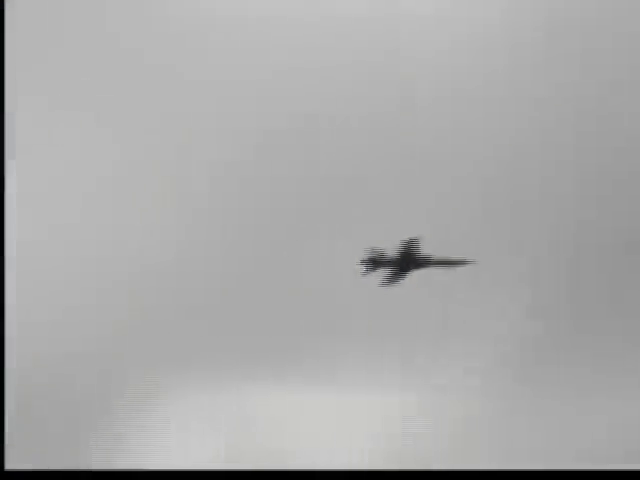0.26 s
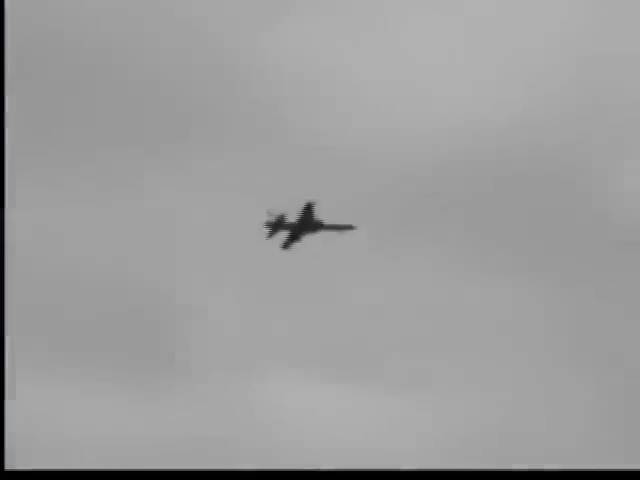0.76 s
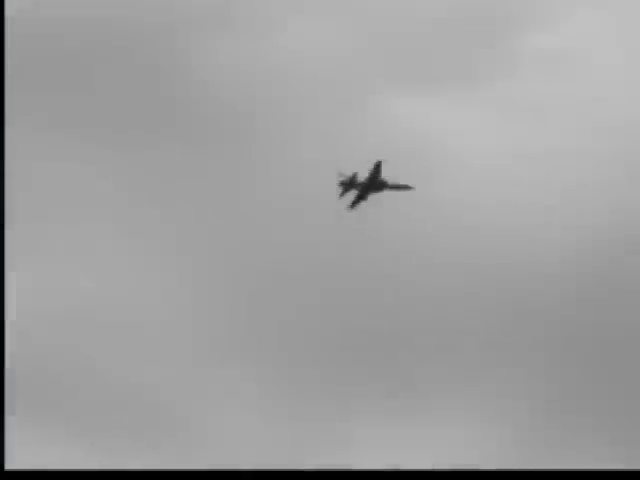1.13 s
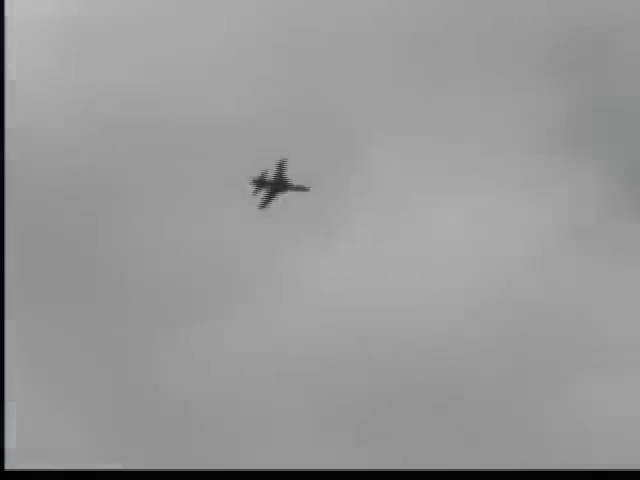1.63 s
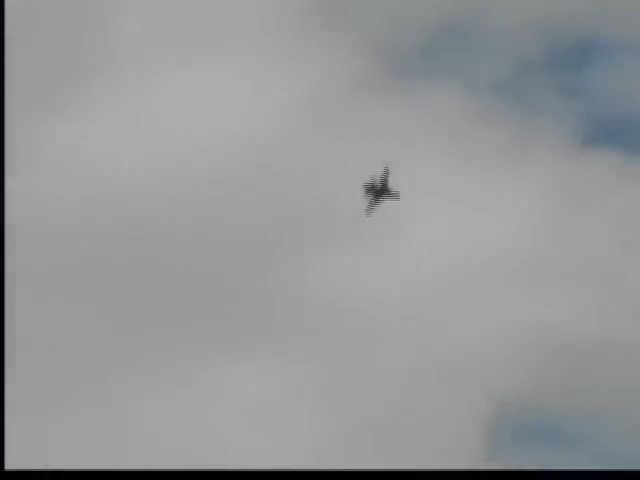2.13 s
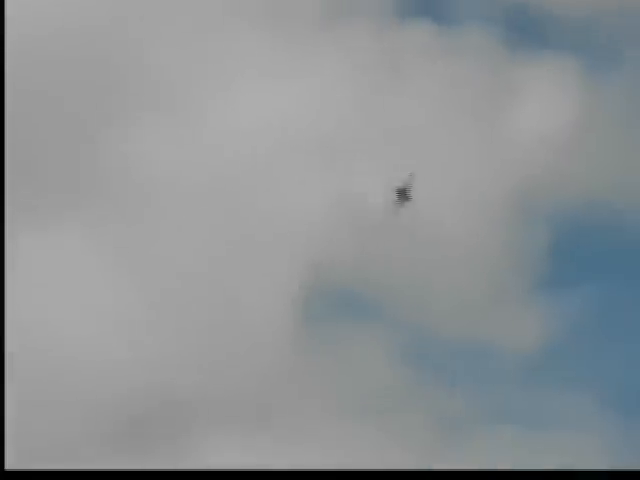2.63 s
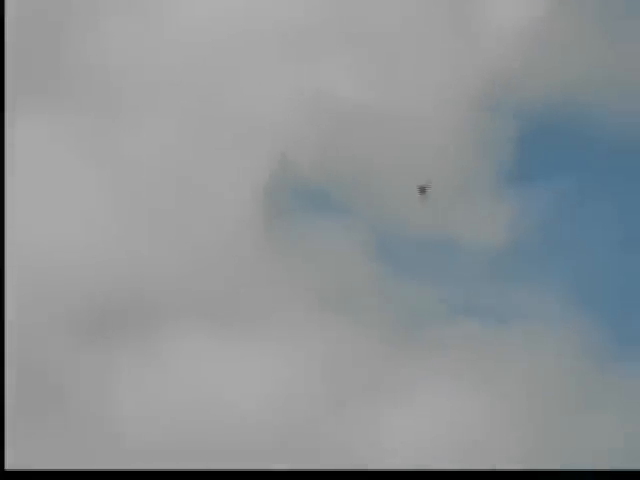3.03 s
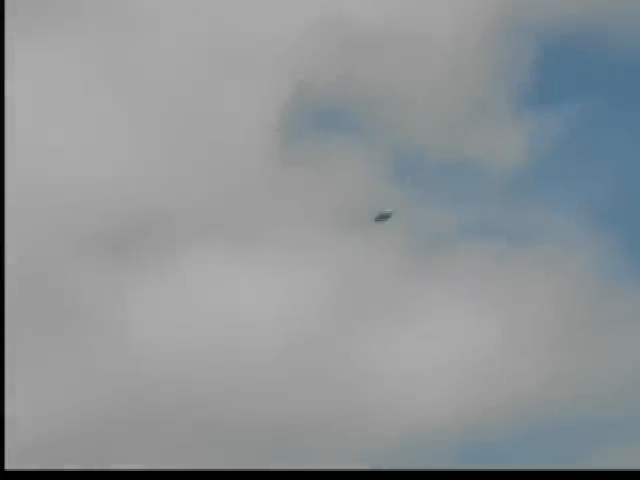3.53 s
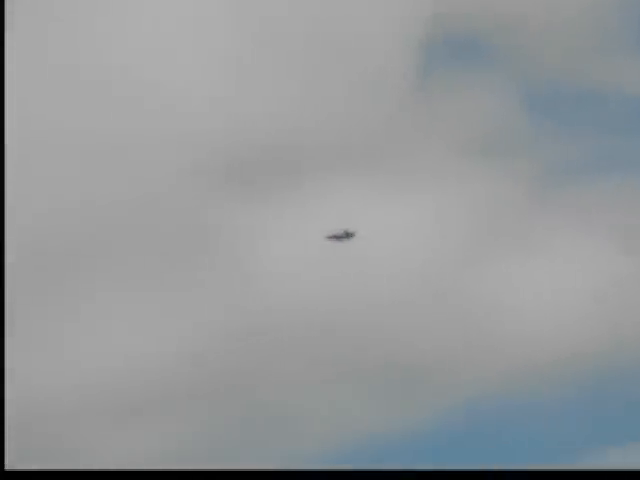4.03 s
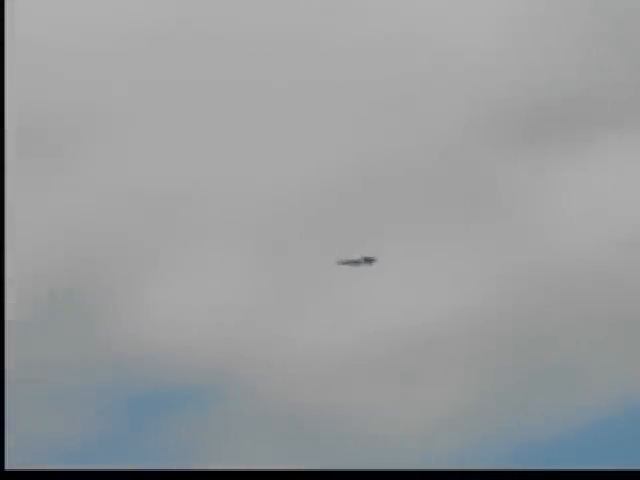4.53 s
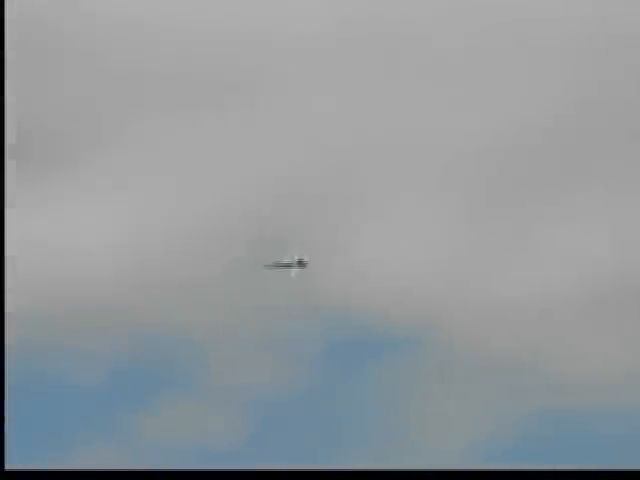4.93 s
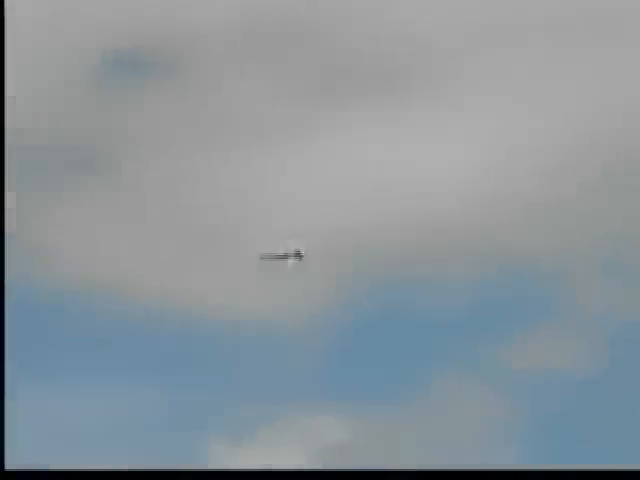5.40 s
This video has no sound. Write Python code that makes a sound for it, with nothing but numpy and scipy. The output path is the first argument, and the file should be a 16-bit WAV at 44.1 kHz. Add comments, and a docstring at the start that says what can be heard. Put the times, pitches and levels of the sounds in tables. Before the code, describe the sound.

A model jet passes over an open field with a low roar and a bright, hollow rush. A faint high turbine whine sinks and fades early. The exhaust flutters and hisses in uneven swells, growing quieter and duller as the jet banks away, then builds again as it turns back. A light breeze rumbles on the microphone over a faint low drone.

```python
"""A model jet with a small gas turbine passes overhead, banks away and turns back over an open field.
Its exhaust is a low roar, a bright rush and a hiss, fluttering in turbulent air; a thin blade tone
sinks and fades early. The ground echo lags a few ms, less as the jet nears the horizon, so a hollow
comb sweeps. Behind it: breeze on the microphone, a low field drone and three faint falling hoots."""
import sys
import numpy as np
from scipy import signal
from scipy.fft import rfft, irfft, next_fast_len
from scipy.io import wavfile
from scipy.ndimage import uniform_filter1d, map_coordinates

SR = 44100
rng = np.random.default_rng(int(sys.argv[2]) if len(sys.argv) > 2 else 0)


def waveform_to_disk(signal):
    """Save audio, clipped to [-1, 1], as 16-bit WAV at the path in sys.argv[1]."""
    frames = np.transpose(np.atleast_2d(signal))
    scaled = np.clip(frames, -1, 1) * 32767
    samples = np.round(scaled).astype(np.int16)
    wavfile.write(sys.argv[1], SR, samples)


N = 249606
FRAME, HOP = 1024, 256
TIME_S = np.arange(N) / SR
FRAME_TIME_S = np.arange(N // HOP + 6) * HOP / SR
BIN_HZ = np.fft.rfftfreq(FRAME, 1 / SR)

# wind rumble (frequency [Hz], relative density [dB])
BREEZE_SPECTRUM = [(20, -44), (45, -26), (68, -26), (85, -5), (105, 0), (125, 2), (160, -3), (220, -8.5),
                   (400, -18.5), (1500, -50.5)]
# field drone (frequency [Hz], relative density [dB])
DRONE_SPECTRUM = [(180, -28), (270, -0.5), (312, 6), (350, 1), (430, -8), (1500, -18.5), (9000, -50)]
# field drone (time [s], level [dB])
DRONE_ENVELOPE = [(0, -61), (1.3, -52), (1.8, -47), (2.8, -45.5), (4, -43), (5, -41.5), (5.66, -52)]
# distant hoots (onset [s], length [s], start pitch [Hz], end pitch [Hz], level [dB])
HOOT_EVENTS = [(1.66, .1, 495, 445, -42), (3.16, .11, 545, 410, -39), (4.0, .1, 520, 425, -41)]

# hollow resonances near the microphone (frequency [Hz], bandwidth [Hz], relative gain [dB])
RING_MODES = [(1015, 40, 8), (1500, 55, 4.5), (1985, 60, 2), (2500, 50, -2.5), (2970, 55, -.5)]
# resonance strength, greatest with the jet high (time [s], gain [dB])
RING_ENVELOPE = [(0, -0.5), (.9, 0.5), (1.35, -4.5), (1.8, -12), (3, -38), (5.66, -28)]
# reflection off grass (frequency [Hz], gain [dB])
GROUND_RESPONSE = [(100, -13), (400, -8), (900, -5.5), (1600, -10), (3000, -7.5), (4500, -9), (11000, -20)]
# ground echo; soft turf turns the phase more on a flat path (time [s], lag [ms], phase lag [rad])
ECHO_PATH = [(.6, 4.06, -.2), (1, 3.99, 0), (1.3, 3.85, .1), (1.6, 3.62, .5), (2.8, 3.2, .3),
             (3.6, 2.96, .7), (4, 2.76, 1.4), (4.8, 2.64, 1.3), (5.66, 2.5, 1)]
# ground echo strength (time [s], gain [dB])
ECHO_ENVELOPE = [(0, 2), (1.3, 6.5), (2, 2.5), (3.3, 1), (4.8, 0.5), (5.66, 2)]

# narrow treble notch near 7.8 kHz (frequency [Hz], gain [dB])
TREBLE_NOTCH = [(7000, 0), (7500, -5), (7750, -43), (7950, -30), (8250, -9.5), (8700, -5.5)]
# diffuse stereo width (frequency [Hz], gain [dB])
WIDTH_RESPONSE = [(200, -28), (800, -35), (1300, -23), (2200, -32), (2600, -22.5), (3800, -10), (4200, -55),
                  (6000, -64), (7000, -38), (9000, -32), (10500, -15)]
# weight of the timing difference between the two microphone ports (frequency [Hz], gain [dB])
PORT_SPREAD_RESPONSE = [(300, -20), (700, -15), (1500, -49), (2200, -34), (2600, -10.5), (3700, -29),
                        (4300, -69), (9000, -54)]
# lean toward the right port (frequency [Hz], gain [dB])
PORT_LEAN_RESPONSE = [(250, -23), (700, -33), (1500, -49), (2600, -37), (5000, -62)]

# Doppler-shifted blade tone (time [s], pitch [Hz])
WHISTLE_PITCH = [(0, 8370), (.4, 8230), (.65, 8090), (1.1, 8030), (1.5, 7900)]
# exhaust roar (frequency [Hz], relative density [dB])
ROAR_SPECTRUM = [(40, -68), (100, -2), (190, -2), (250, -1.5), (320, -1), (440, -0.5), (540, 0.5), (700, 3),
                 (880, -4), (1300, -6.5), (3000, -43.5)]
# exhaust roar, strongest behind the nozzle (time [s], level [dB])
ROAR_ENVELOPE = [(0, -35.5), (.7, -38), (2.5, -39), (2.8, -41.5), (4.15, -38.5), (4.95, -33.5),
                 (5.66, -40.5)]
# exhaust rush (frequency [Hz], relative density overhead [dB], far off [dB])
RUSH_SPECTRA = [(500, -66, -28), (825, -8, -9.5), (996, -4, 0), (1220, -1.5, 2), (1460, 2, -1),
                (2010, 2.5, 0), (2340, 2.5, 4), (2460, 1.5, -1), (2916, -1.5, -4), (3650, -9.5, -18),
                (4960, -33, -33), (9000, -55, -52)]
# exhaust hiss (frequency [Hz], relative density overhead [dB], far off [dB])
HISS_SPECTRA = [(1500, -40, -17), (2860, 4.5, 8.5), (3650, 2, 1.5), (3780, -1.5, 4.5), (4760, -3.5, 2.5),
                (5350, -1, -2.5), (6330, -7, -9), (7400, -12.5, -21), (9400, -10, -15.5),
                (10320, -12, -23.5), (12350, -23, -61)]
# pass, turn, return (time [s], rush level before tilt [dB], rush tilt [dB/octave], hiss offset [dB])
FLIGHT_ENVELOPES = [(0, -21, -4.5, -15), (.55, -20, -1, -15), (1.42, -24, 0.5, -11.5),
                    (1.62, -28.5, -0.5, -13), (2.42, -31.5, -2, -15), (2.7, -39.5, -5, -14),
                    (3.25, -39.5, -7.5, -17.5), (3.55, -46.5, -10.5, -11.5), (4.0, -41.5, -15, -22.5),
                    (4.15, -39.5, -4, -12.5), (4.6, -34, -9, -15), (4.98, -30.5, -8, -17.5),
                    (5.24, -28, -8.5, -19.5), (5.38, -29.5, 0, -6), (5.55, -26, -4.5, -5),
                    (5.66, -29.5, 4.5, -9)]
# jet position (time [s], remoteness [0 overhead, 1 far and low])
REMOTENESS = [(0, 0.019), (1, 0), (1.6, 0.42), (2.5, 0.43), (3.3, 0.75), (4, 0.32), (4.6, 0.71),
              (5.66, 0.85)]
# swells and dips from large eddies (centre [s], width [s], rush gain [dB], hiss gain [dB])
EDDY_SWELLS = [(0.096, 0.048, 2.5, 2.5), (0.258, 0.098, -4, -8.5), (0.537, 0.11, 1, 5),
               (0.841, 0.071, -6.5, 1), (0.977, 0.062, 2, 8), (1.302, 0.06, -2.5, 2.5),
               (1.566, 0.051, -2.5, -2.5), (1.864, 0.12, 4.5, 10), (2.012, 0.1, -4.5, -7),
               (2.106, 0.14, 5, 7), (2.325, 0.17, 1, 6.5), (2.448, 0.094, 1, 9), (2.773, 0.095, -4, 1.5),
               (3.133, 0.21, 3.5, 11), (4.286, 0.12, 3, 2.5), (4.89, .18, 1.5, 5)]


def gain_of(db):
    """Decibels to amplitude."""
    return 10 ** (np.asarray(db) / 20)


def unit_rms(x):
    """Scale to rms 1."""
    return x / np.sqrt(np.mean(x ** 2) + 1e-20)


def spectrum_db(table, hz):
    """Interpolate a spectrum table over log frequency."""
    table_hz, db = np.transpose(table)
    return np.interp(np.log(hz + 1), np.log(table_hz + 1), db)


def follow(table, time_s=TIME_S):
    """Interpolate each value column over time."""
    table_s, *columns = np.transpose(table)
    return [np.interp(time_s, table_s, column) for column in columns]


def filtered(x, response):
    """Zero-phase filter from a spectrum table."""
    size = next_fast_len(N + 4096)
    gain = gain_of(spectrum_db(response, np.fft.rfftfreq(size, 1 / SR)))
    return irfft(rfft(x, size) * gain, size)[..., :N]


def delayed(x, lag_ms):
    """Fractional delay, constant or moving."""
    return map_coordinates(x, [np.arange(N) - lag_ms * SR / 1000], order=3, mode="mirror")


def wander(samples):
    """Random curve of rms 1, smooth over the given span."""
    return unit_rms(uniform_filter1d(uniform_filter1d(rng.standard_normal(N), samples), samples))


def breeze(start_db=-53, rise_db_per_s=2.18, gust_db=2):
    """Gusty wind rumble at each microphone port, growing louder as the jet fades."""
    gusts = unit_rms(sum(np.sin(2 * np.pi * (hz * TIME_S + rng.random())) / np.sqrt(hz)
                         for hz in np.geomspace(1.5, 8, 20)))
    rumble = unit_rms(filtered(rng.standard_normal((2, N)), BREEZE_SPECTRUM))
    port_db = np.array([[1], [3]])
    return rumble * gain_of(start_db + rise_db_per_s * TIME_S + gust_db * gusts + port_db)


def field_drone():
    """Low, distant noise, louder once the jet has passed."""
    level_db, = follow(DRONE_ENVELOPE)
    return gain_of(level_db) * unit_rms(filtered(rng.standard_normal(N), DRONE_SPECTRUM))


def hoots(waver_ratio=0.0377, flutter_db=3):
    """Short, wavering, falling tones, half buried in the roar."""
    out = np.zeros(N)
    for onset_s, length_s, start_hz, end_hz, level_db in HOOT_EVENTS:
        progress = np.clip((TIME_S - onset_s) / length_s, 0, 1)
        hz = (start_hz + (end_hz - start_hz) * progress) * (1 + waver_ratio * wander(samples=150))
        arch = np.sqrt(abs(np.sin(np.pi * progress)))
        envelope = arch * gain_of(level_db + flutter_db * wander(samples=400))
        out += envelope * np.sin(2 * np.pi * np.cumsum(hz) / SR)
    return out


def diffuse_width(x, t60_s=0.14):
    """Faint diffuse stereo width, strongest around 2.5-3.8 kHz."""
    time_s = TIME_S[:SR // 4]
    tail = rng.standard_normal(len(time_s)) * gain_of(-60 * time_s / t60_s)
    decorrelated = signal.oaconvolve(x, tail / np.linalg.norm(tail))[:N]
    return filtered(decorrelated, WIDTH_RESPONSE)


def with_hollow_ring(x, ring_power_ratio=0.6):
    """Narrow resonances gather part of the sound into breathy tones."""
    strength = gain_of(follow(RING_ENVELOPE)[0])
    ring = sum(gain_of(db) * signal.lfilter(*signal.iirpeak(hz, hz / width_hz, SR), x)
               for hz, width_hz, db in RING_MODES)
    return (x + strength * ring) / np.sqrt(1 + ring_power_ratio * strength ** 2)


def with_ground_echo(direct, trim_db=-2.0):
    """Direct sound and ground echo interfere in a sweeping comb."""
    lag_ms, phase_rad = follow(ECHO_PATH)
    echo_db, = follow(ECHO_ENVELOPE)
    bounce = delayed(filtered(direct, GROUND_RESPONSE), lag_ms)
    analytic = signal.hilbert(bounce, next_fast_len(N))[:N]
    echo = (analytic * np.exp(-1j * phase_rad)).real
    return gain_of(trim_db) * (direct + gain_of(echo_db) * echo)


def eddy_flutter(slow_hz, fast_hz, width_bins):
    """Turbulent modulation: frames x bins, rms 1, mostly between the two rates."""
    frames = len(FRAME_TIME_S)
    rate_hz = np.fft.rfftfreq(frames, HOP / SR)[:, None]
    field = rng.standard_normal((frames, len(BIN_HZ)))
    for _ in range(2):
        field = uniform_filter1d(field, width_bins, axis=1, mode="wrap")
    band_pass = rate_hz ** 2 / (rate_hz ** 2 + slow_hz ** 2) / (1 + (rate_hz / fast_hz) ** 2)
    return unit_rms(irfft(rfft(field, axis=0) * band_pass, frames, axis=0))


def eddy_swells_db(time_s):
    """Large eddies focus or deflect rush and hiss: one bell in time each."""
    centre_s, width_s, rush_db, hiss_db = np.transpose(EDDY_SWELLS)
    bells = np.exp(-(2 * (time_s - centre_s) / width_s) ** 2)
    return bells @ rush_db[:, None], bells @ hiss_db[:, None]


def turbine_whistle(level_db=-53, hold_s=1.1, fade_db_per_s=55, waver_ratio=0.0015, flutter_db=3):
    """Blade tone, wavering in the eddies; holds while the intake faces the listener, then fades."""
    hz, = follow(WHISTLE_PITCH)
    envelope_db = level_db - fade_db_per_s * np.maximum(TIME_S - hold_s, 0)
    cycles = np.cumsum(hz * (1 + waver_ratio * wander(samples=300))) / SR
    return gain_of(envelope_db + flutter_db * wander(samples=900)) * np.sin(2 * np.pi * cycles)


def blend_db(spectra, remoteness):
    """Crossfade from the overhead spectrum to the distant one."""
    spectra = np.array(spectra)
    overhead_db = spectrum_db(spectra[:, [0, 1]], BIN_HZ)
    far_db = spectrum_db(spectra[:, [0, 2]], BIN_HZ)
    return (1 - remoteness) * overhead_db + remoteness * far_db


def hump(shape_db, level_db):
    """Frames x bins magnitude with total power set by level_db."""
    shape = gain_of(shape_db)
    return gain_of(level_db) * shape / np.sqrt(np.sum(shape ** 2, -1, keepdims=True))


def shaped_noise(magnitude):
    """White noise shaped by a frames x bins magnitude."""
    white = rng.standard_normal((len(FRAME_TIME_S) - 1) * HOP)
    _, _, spectra = signal.stft(white, nperseg=FRAME, noverlap=FRAME - HOP)
    _, noise = signal.istft(spectra * magnitude.T, nperseg=FRAME, noverlap=FRAME - HOP)
    return noise[:N] * np.sqrt(FRAME / 2)


def jet_exhaust(roar_trim_db=1.5, rush_trim_db=3, hiss_trim_db=3.5):
    """Turbulent mixing noise in three humps; eddies on the path flutter the treble most."""
    time_s = FRAME_TIME_S[:, None]
    roar_db, = follow(ROAR_ENVELOPE, time_s)
    flight_db, tilt_db_per_octave, hiss_offset_db = follow(FLIGHT_ENVELOPES, time_s)
    remoteness, = follow(REMOTENESS, time_s)
    rush_swell_db, hiss_swell_db = eddy_swells_db(time_s)
    rush_db = flight_db + rush_trim_db + rush_swell_db
    hiss_db = flight_db + hiss_offset_db + hiss_trim_db + hiss_swell_db

    roar = hump(spectrum_db(ROAR_SPECTRUM, BIN_HZ), roar_db + roar_trim_db)
    rush = hump(blend_db(RUSH_SPECTRA, remoteness), rush_db)
    hiss = hump(blend_db(HISS_SPECTRA, remoteness), hiss_db)
    octaves = np.log2(np.clip(BIN_HZ, 1000, 2900) / 1350)
    rush *= gain_of(tilt_db_per_octave * octaves)  # duller with the tail toward the listener

    broad_db = 0.57 * eddy_flutter(slow_hz=3.7, fast_hz=9.8, width_bins=120)
    patchy_db = 1.21 * eddy_flutter(slow_hz=0.72, fast_hz=8.2, width_bins=10)
    treble_weight = (np.minimum(BIN_HZ, 6000) / 2000) ** 0.61
    flutter = gain_of(treble_weight * (broad_db + patchy_db))
    return shaped_noise(np.sqrt(roar ** 2 + rush ** 2 + hiss ** 2) * flutter)


def scene(port_lag_ms=0.025):
    """Jet near centre; port spacing, diffuse width and breeze make left and right differ."""
    jet = with_hollow_ring(with_ground_echo(jet_exhaust())) + turbine_whistle()
    mid = jet + field_drone() + hoots()
    port_difference = delayed(mid, port_lag_ms) - delayed(mid, -port_lag_ms)
    side = filtered(port_difference, PORT_SPREAD_RESPONSE)
    side += diffuse_width(mid) - filtered(mid, PORT_LEAN_RESPONSE)
    return np.array([mid + side, mid - side]) + breeze()


def record(dry, cutoff_hz=11900):
    """Narrow treble notch, then band limit."""
    low_pass = signal.firwin(401, cutoff_hz, window=("kaiser", 9), fs=SR)
    return signal.oaconvolve(filtered(dry, TREBLE_NOTCH), low_pass[None], "same")


dry = scene()
out = record(dry)
waveform_to_disk(out)
```